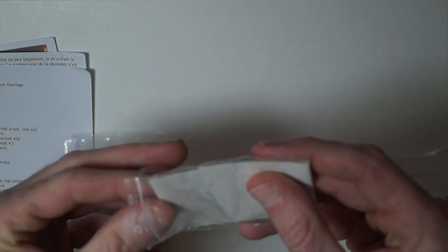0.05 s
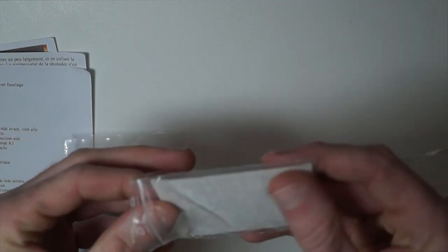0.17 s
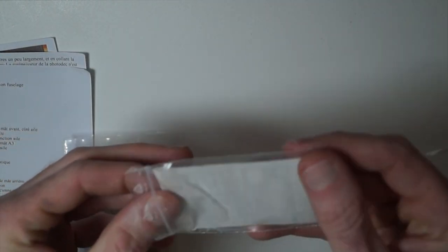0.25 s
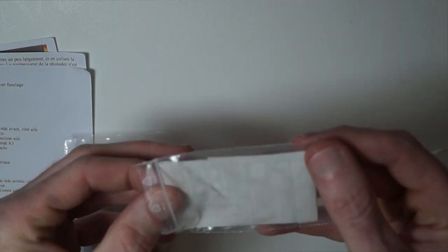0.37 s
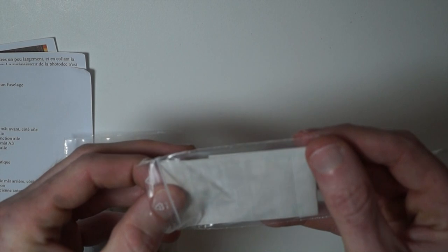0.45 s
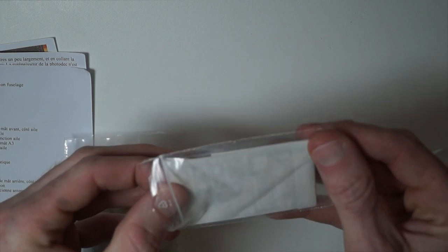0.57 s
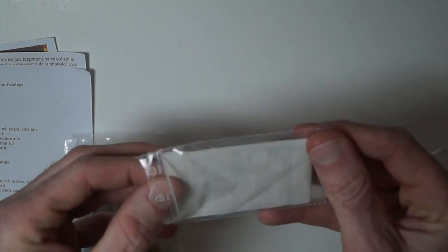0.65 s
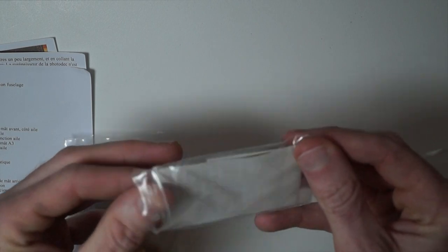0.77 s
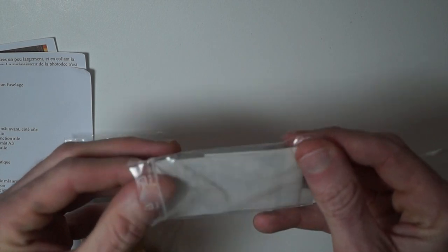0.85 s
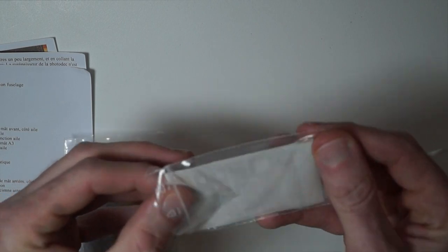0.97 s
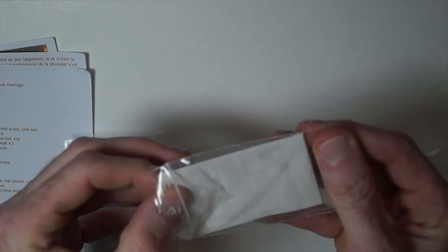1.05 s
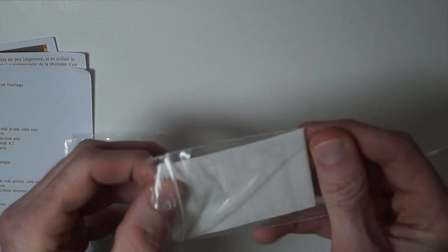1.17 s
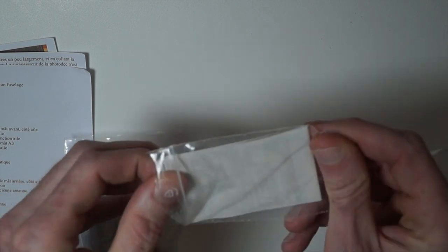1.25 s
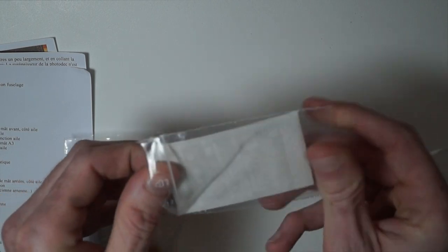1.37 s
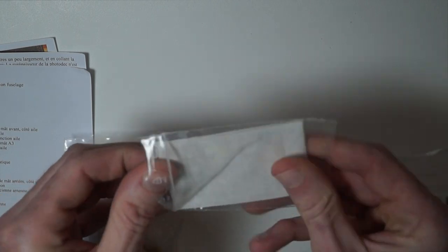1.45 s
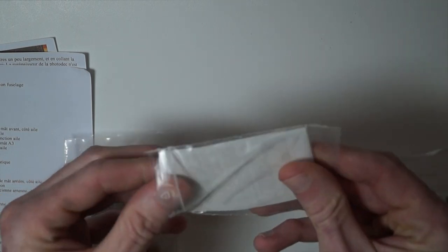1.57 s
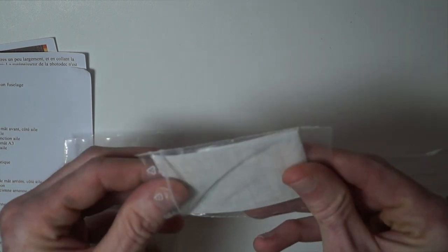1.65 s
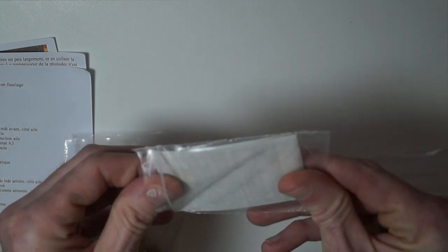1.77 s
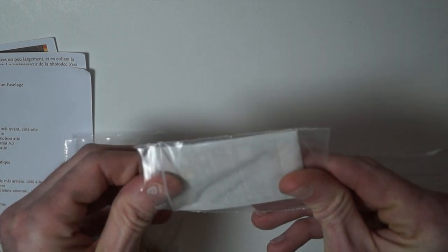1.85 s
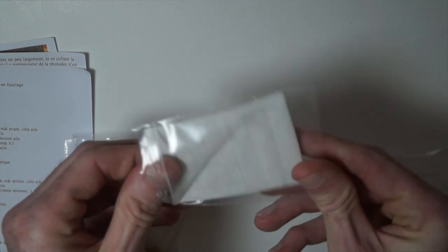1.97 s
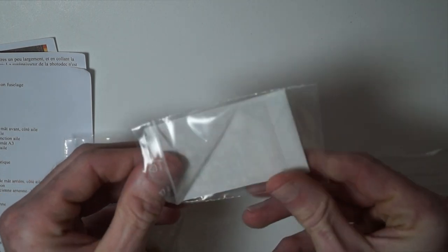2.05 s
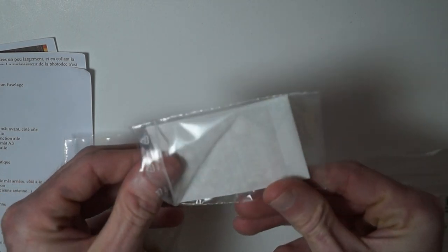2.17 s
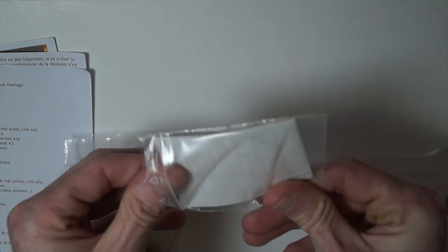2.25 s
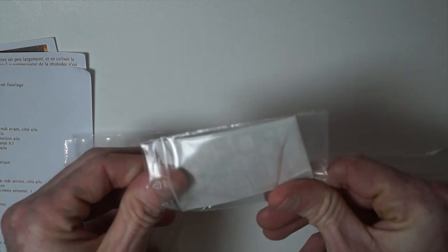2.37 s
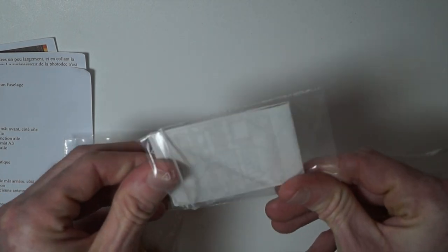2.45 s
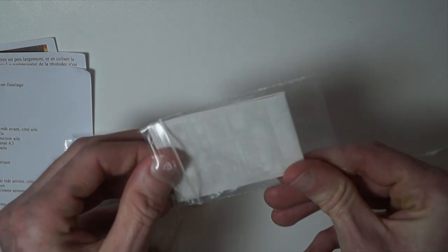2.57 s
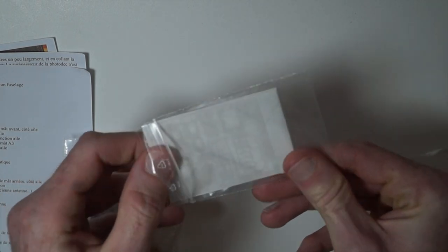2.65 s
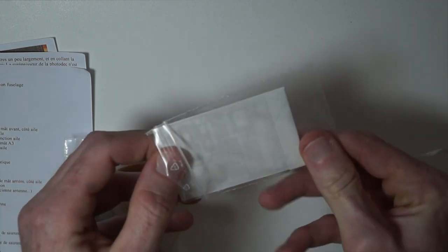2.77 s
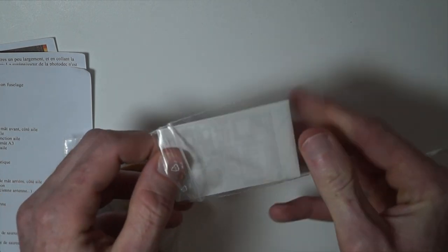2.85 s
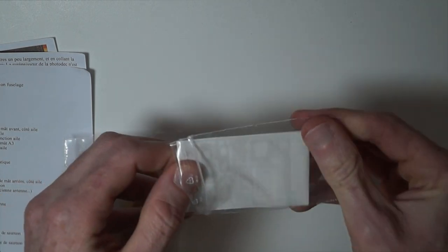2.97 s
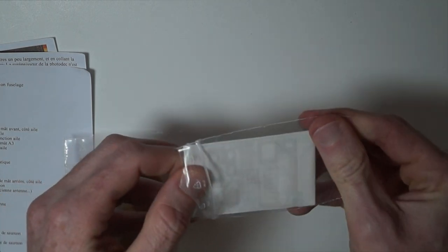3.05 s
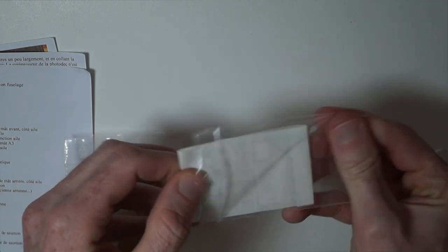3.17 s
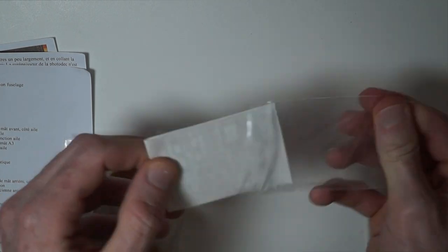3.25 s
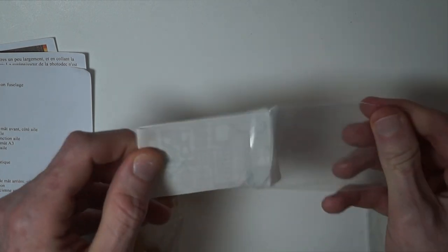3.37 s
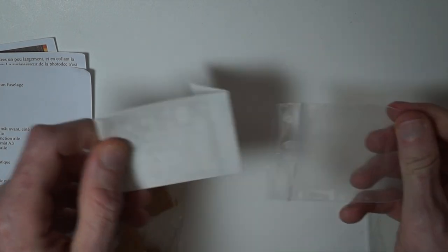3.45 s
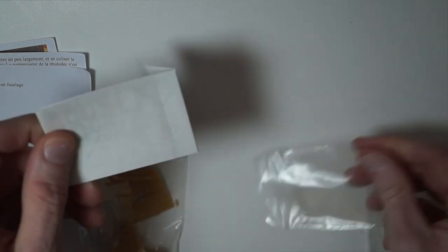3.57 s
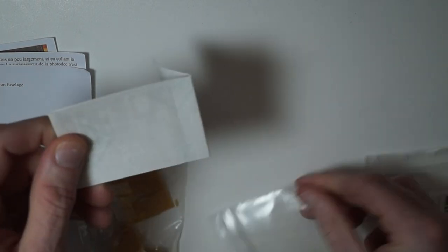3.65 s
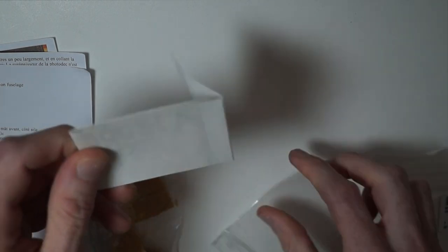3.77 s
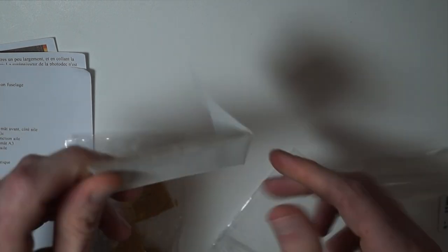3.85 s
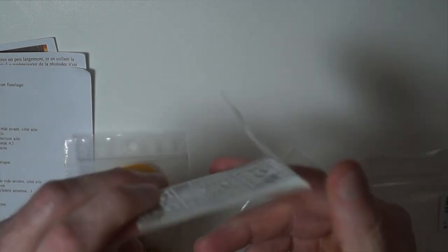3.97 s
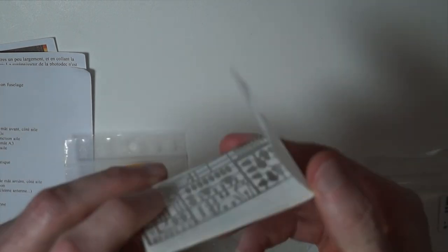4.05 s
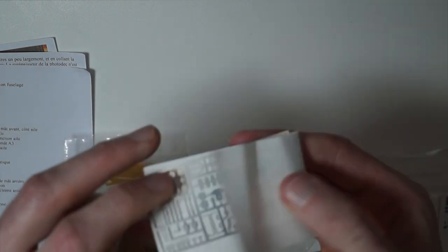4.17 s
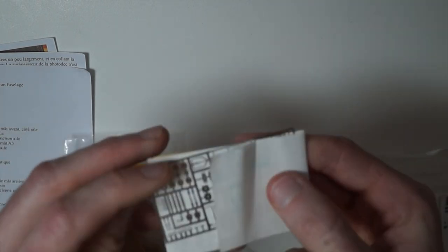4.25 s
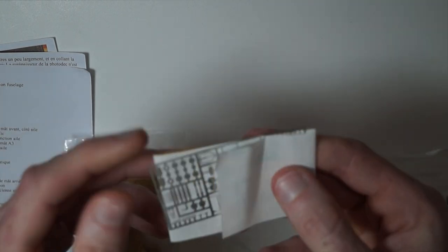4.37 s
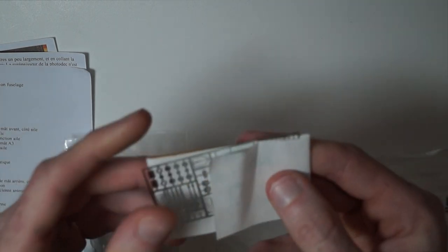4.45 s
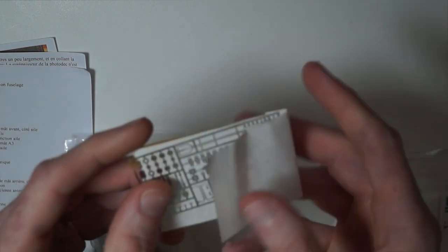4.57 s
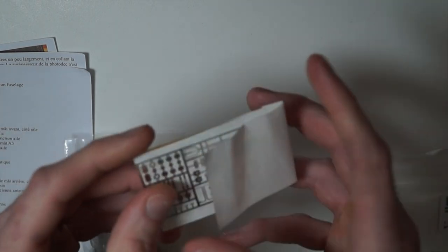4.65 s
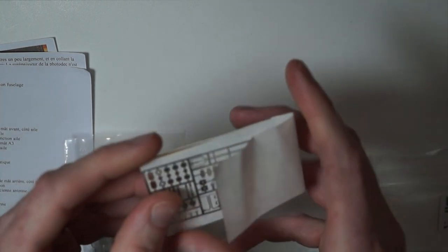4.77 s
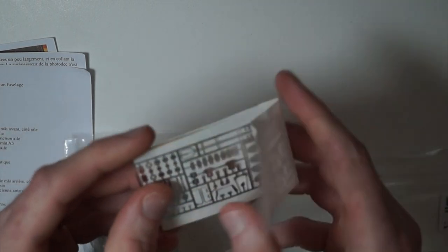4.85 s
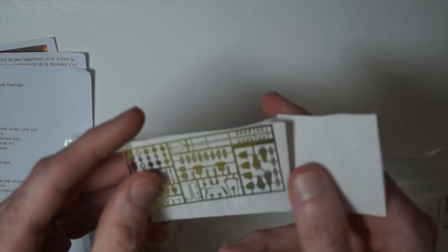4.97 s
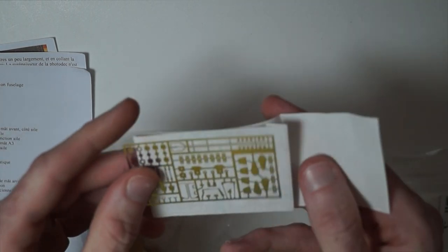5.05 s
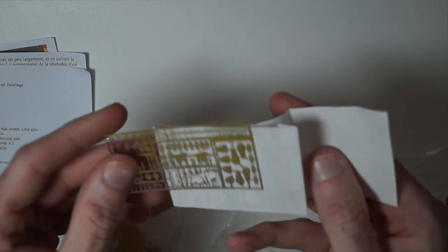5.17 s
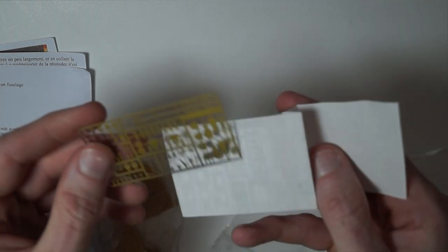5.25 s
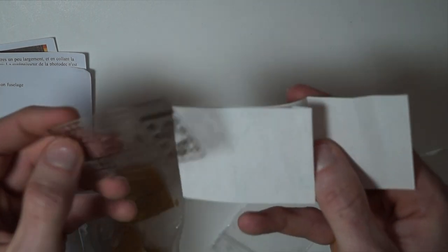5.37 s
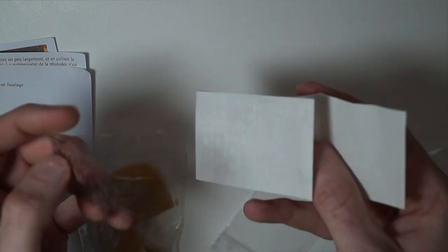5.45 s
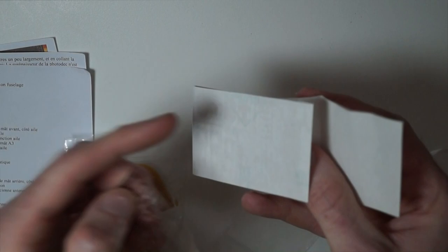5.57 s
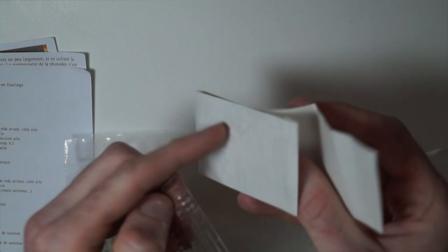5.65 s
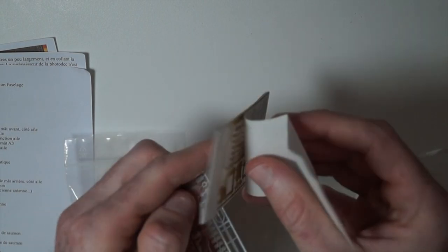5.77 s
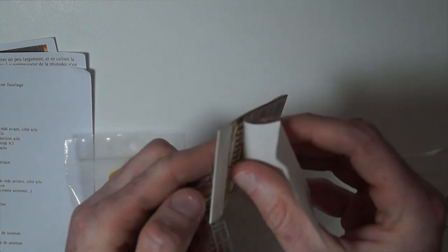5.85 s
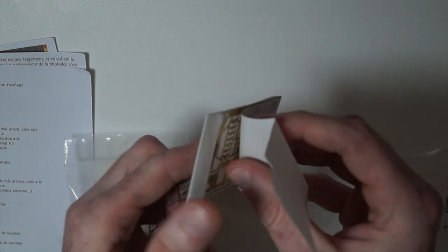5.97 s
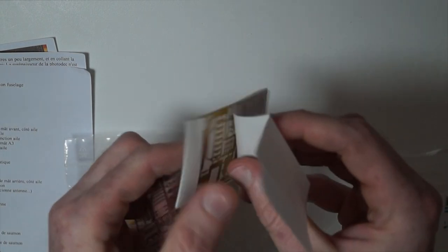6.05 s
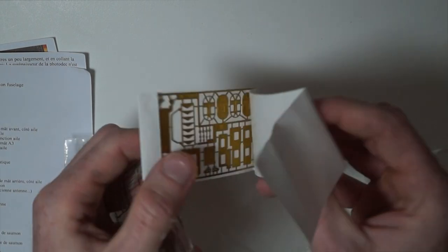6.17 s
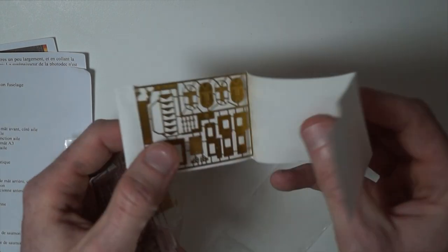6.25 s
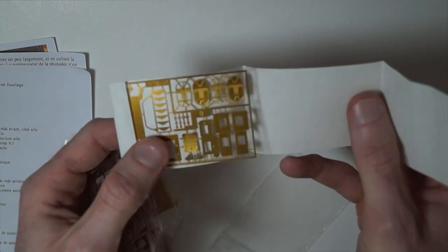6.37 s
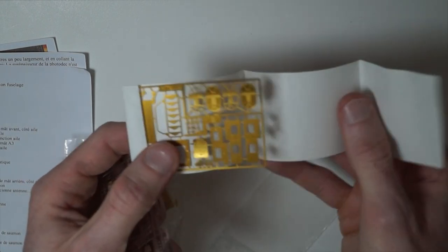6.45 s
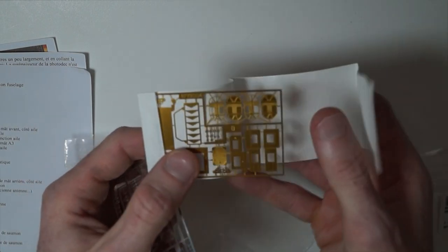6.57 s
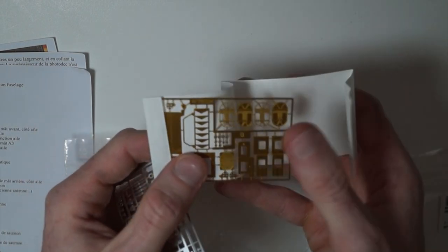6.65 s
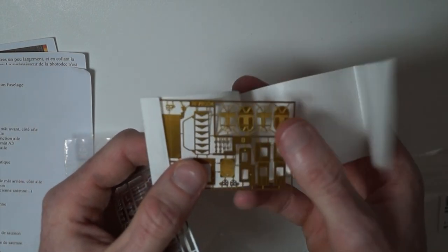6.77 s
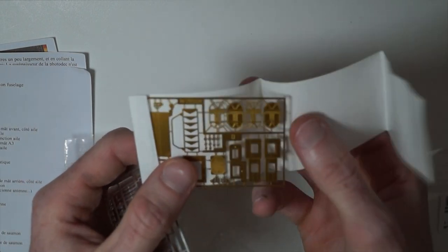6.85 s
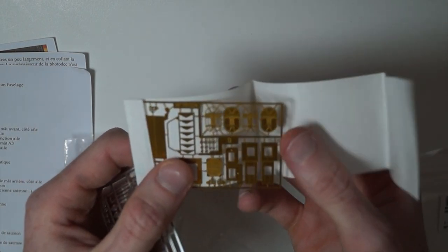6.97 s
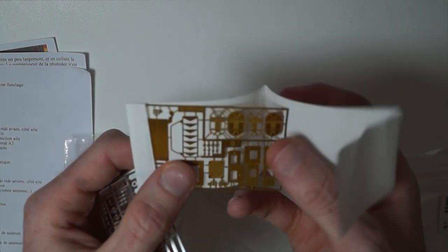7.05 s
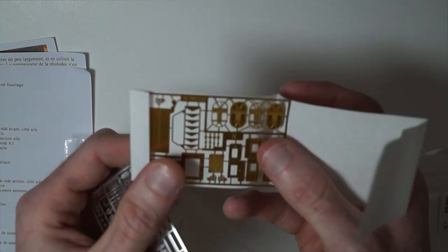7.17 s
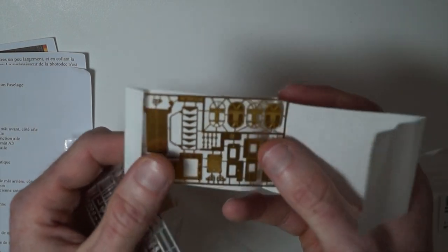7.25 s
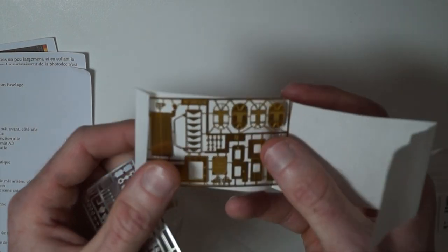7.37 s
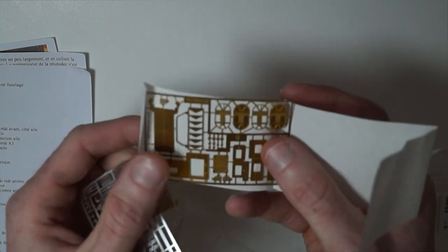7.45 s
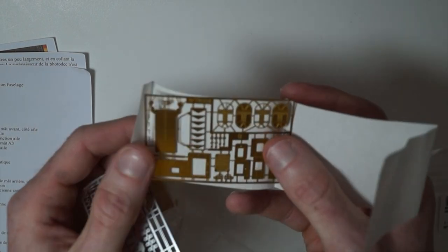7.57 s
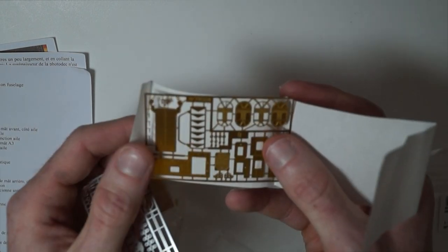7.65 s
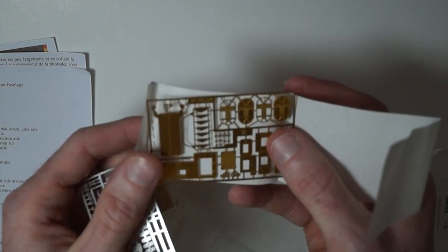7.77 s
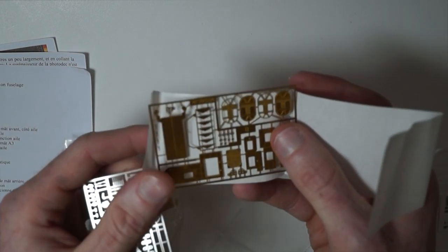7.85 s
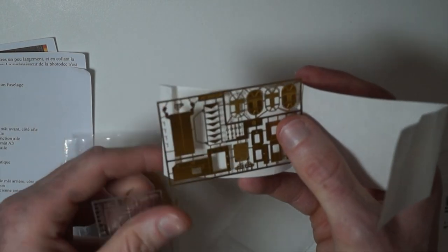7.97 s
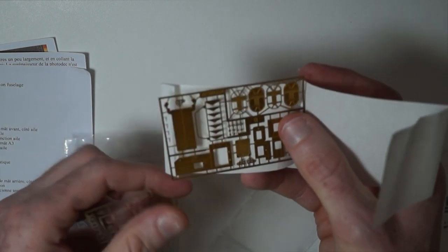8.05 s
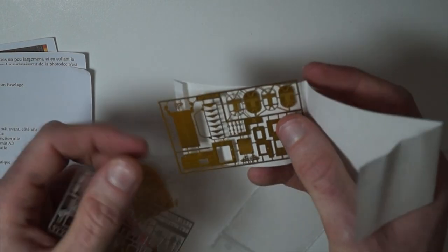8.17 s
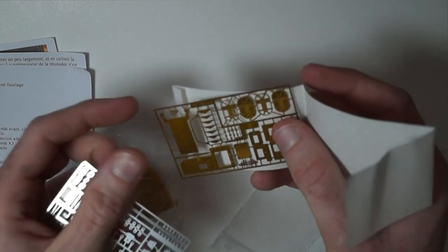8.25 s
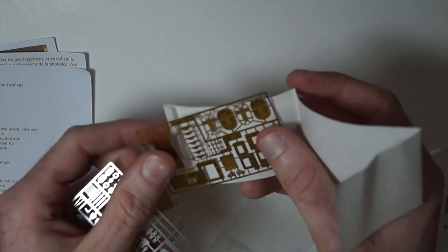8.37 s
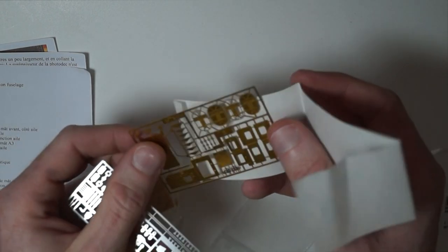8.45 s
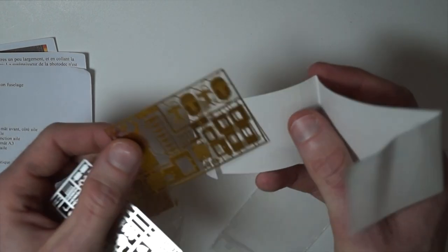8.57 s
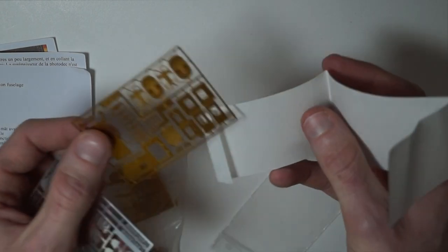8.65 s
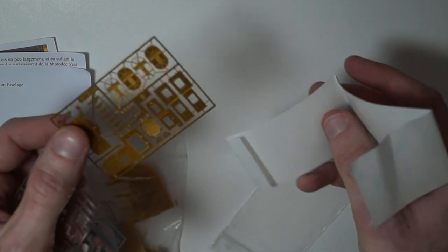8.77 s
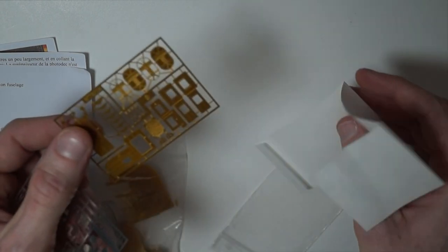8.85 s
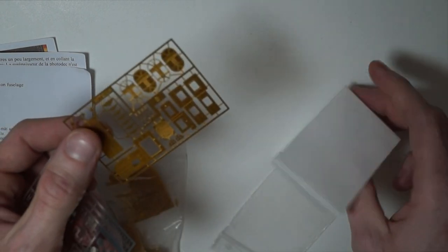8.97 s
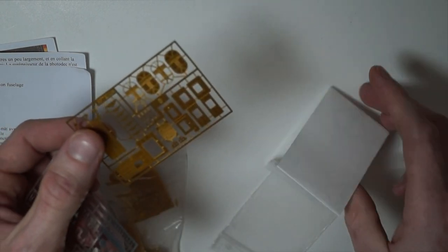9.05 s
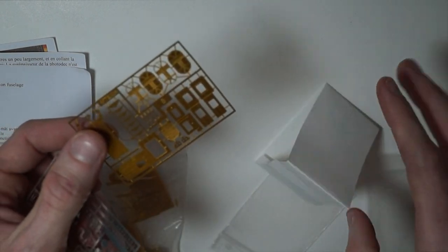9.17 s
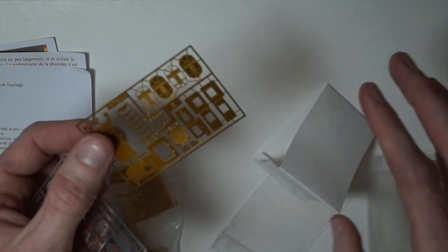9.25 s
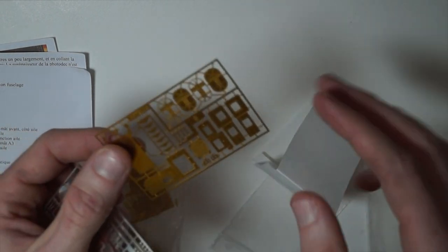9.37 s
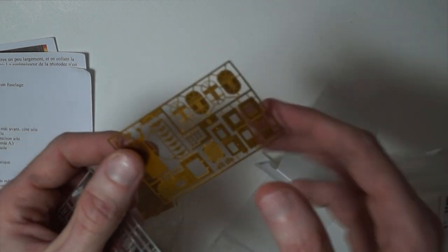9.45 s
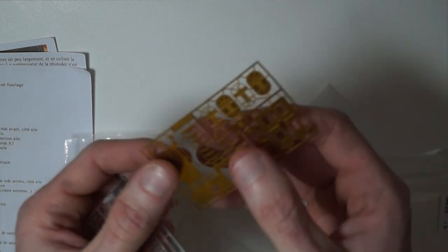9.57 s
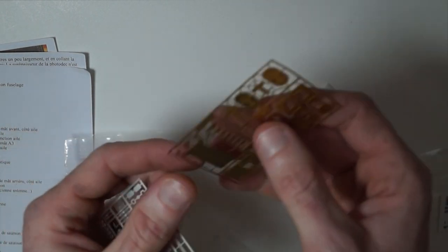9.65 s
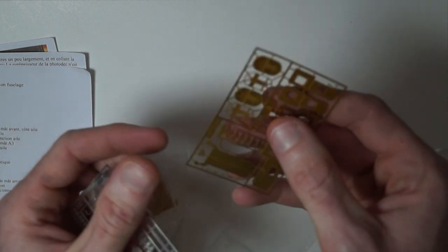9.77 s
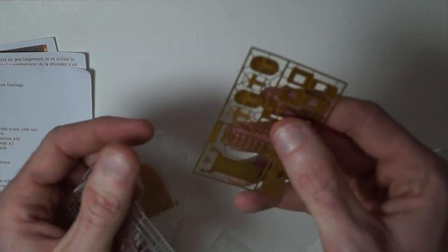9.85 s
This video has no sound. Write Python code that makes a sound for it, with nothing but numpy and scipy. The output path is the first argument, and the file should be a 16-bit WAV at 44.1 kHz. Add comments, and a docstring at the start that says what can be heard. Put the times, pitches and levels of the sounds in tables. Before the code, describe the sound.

Close up in a small quiet room, hands work a folded paper sleeve out of a thin plastic bag: irregular sharp crackles, a cluster of snaps, then the loudest rushing pull and snap. A soft desk bump follows. Stiff paper then unfolds with drier, lighter rustles and flicks, while thin metal sheets rub over it with a faint rasp and tiny clicks. Steady low hiss lies beneath.

```python
"""In a small quiet room, close up, hands slide a folded paper sleeve out of a plastic bag just above a desk.
The film snaps and hisses until the sleeve comes free, and a hand bumps the desk.
Then the stiff paper is unfolded and thin metal sheets slide over it.
Snaps are short noise bursts, sliding is noise broken up by tiny catches, and taps and bumps are
dying tones. The desk colours the handling, the room adds echoes, and a steady hiss lies beneath."""
import sys
import numpy as np
from scipy import signal
from scipy.fft import rfft, irfft
from scipy.io import wavfile

SR = 44100
rng = np.random.default_rng(int(sys.argv[2]) if len(sys.argv) > 2 else 0)


def dump(signal):
    """Clip the signal to [-1, 1] and save it as 16-bit WAV at the path in sys.argv[1]."""
    limited = np.clip(np.atleast_2d(signal).T, -1, 1)
    pcm = np.round(limited * 32767).astype(np.int16)
    wavfile.write(sys.argv[1], SR, pcm)


N = 436590

# tone colour of the plastic film, before it is evened out: [f/Hz, level/dB]
FILM_COLOUR = [(30, -53), (100, -28), (200, -19.5), (450, -7.5), (900, -2.5), (2000, 1.5), (4000, -2),
               (7000, -2), (11000, -3), (16000, -7.5)]
# tone colour of the stiff paper, before it is evened out: [f/Hz, level/dB]
PAPER_COLOUR = [(30, -50), (100, -26.5), (200, -21), (370, -7), (700, -3), (2000, -1.5), (4500, -6),
                (9000, -2), (15500, -2.5)]
# how alike left and right are for sounds at the hands: [f/Hz, likeness/0-1]
NEAR_LIKENESS = [(200, 0.78), (1200, 0.73), (2500, 0.81), (4500, 0.81), (8000, 0.15), (14000, 0.33)]
BAG_DOWN_S = 3.85  # the bag is let go; from here on only paper is handled
REST_S = 9.33  # the hands come to rest
BODY_HZ, SIZZLE_HZ = 1300, 6000  # borders between body, crackle and sizzle
CUT_HZ = 16080  # upper limit of the sound's bandwidth


def amp(db):
    """Turns decibels into a plain multiplier."""
    return 10 ** (np.asarray(db) / 20)


def unit(x):
    """Scales to an rms (average strength) of 1."""
    return x / np.sqrt(np.mean(x ** 2) + 1e-20)


def read(points, hz):
    """Reads a table between its points, on a logarithmic frequency axis."""
    f, value = np.transpose(points)
    return np.interp(np.log(hz + 1), np.log(f + 1), value)


def add(mix, s, sound):
    """Adds a sound to the mix at time s."""
    part = mix[..., max(round(s * SR), 0):][..., :sound.shape[-1]]
    part += sound[..., :part.shape[-1]]


def pair(likeness, size):
    """Makes spectra of two white noises, left and right, that are partly alike."""
    hz = np.fft.rfftfreq(size, 1 / SR)
    left, other = rfft(rng.standard_normal((2, size)))
    same = np.clip(read(likeness, hz), -1, 1)
    right = same * left + np.sqrt(1 - same ** 2) * other
    return hz, np.array([left, right])


def registers(colour, hz):
    """Splits a material's colour into body (low), crackle (middle) and sizzle (high), each of power 1."""
    above_body = 1 / (1 + (BODY_HZ / (hz + 1)) ** 6)
    above_crackle = 1 / (1 + (SIZZLE_HZ / (hz + 1)) ** 6)
    shares = [1 - above_body, above_body - above_crackle, above_crackle]
    return [unit(amp(read(colour, hz)) * np.sqrt(abs(share))) for share in shares]


def causal(gain):
    """Gives a frequency response the phase of a thing that rings only after it is struck."""
    log_gain = np.log(np.maximum(gain, 1e-5))
    circle = np.concatenate([log_gain, log_gain[-2:0:-1]])
    return np.exp(np.conj(signal.hilbert(circle)))[:len(gain)]


def effort():
    """Crackle, body and sizzle levels (dB) over time: each stroke rises, swells or eases, and dies away."""
    # strokes of the hands, one surface sliding over another; the last two levels are relative to the first:
    # [start/s, length/s, level/dB, swell from start to end/dB, body/dB, sizzle/dB]
    strokes = [ (0, 2.85, -68, -6, 2.5, -8), (0.028, 0.14, -57, -4, -0.5, -8),
               (0.228, 0.013, -42, -3.5, -5, 4), (0.337, 0.17, -64.5, -5, 4, -8),
               (0.525, 0.12, -62.5, -18, 3.5, -10), (0.683, 0.088, -51, -6, -7, 1),
               (0.79, 0.096, -57.5, 4, 5.5, -5), (0.91, 0.11, -48.5, -1, -5, -0.5),
               (1.158, 0.093, -53.5, 0, 1.5, 0.5), (1.3, 0.025, -58.5, -7, 2.5, 6),
               (1.435, 0.13, -55.5, 2, -2.5, 0), (1.6, 0.1, -59, -3, 0, -1),
               (1.935, 0.11, -61.5, -1, -7, 2.5), (2.21, 0.074, -57.5, -6, 1.5, -3),
               (2.349, 0.068, -42.5, 12.5, -10.5, -3.5), (2.49, 0.15, -54.5, -8, 0.5, -3),
               (2.8, 0.03, -63, 11, -1, 8), (2.95, 0.013, -55.5, -8, -2, 5), (3.09, .07, -56, -1, -14, 4),
               (3.174, 0.084, -31.5, 0, -17.5, -2.5), (3.343, .035, -48.5, 8.5, -3, -1),
               (3.403, 0.024, -27.5, -2, -13, 0), (3.455, 0.047, -52.5, -4, -1.5, -14),
               (3.598, 0.16, -59, -6, -4.5, 3.5), (3.98, 0.15, -49, -1, -4, 2),
               (4.11, 0.023, -42.5, -7, -1, -2), (4.15, 0.024, -49.5, 3, -6, 7),
               (4.19, 0.011, -43.5, -2, 0.5, 1.5), (4.251, 0.012, -41.5, -11, -2.5, 1),
               (4.49, 0.037, -59.5, -1, 6, 7), (4.57, 0.043, -67, 4, -12, 11),
               (4.774, .165, -53.5, 1.5, -3.5, 9), (5, .1, -57.5, 8, -3, 9.5),
               (5.11, 0.12, -59, -8, -19, 13.5), (5.222, 0.072, -47.5, -5, -30, 9.5),
               (5.315, 0.012, -52.5, 1, 3, 2), (5.403, 0.048, -52.5, -2.5, 2, 5),
               (5.587, 0.022, -48, -8, 2.5, -6), (5.665, 0.074, -51, -14, -2, 8.5),
               (5.757, 0.02, -47.5, -3, 1.5, 9), (5.827, 0.071, -53.5, -7.5, -13, 3),
               (5.93, 0.046, -62.5, 1, -1, 3), (6.052, .022, -50.5, 1.5, 6, 3.5),
               (6.16, .08, -53.5, 5, -0.5, -0.5), (6.249, 0.022, -43.5, 10.5, -3, 0.5),
               (6.295, 0.048, -52.5, -2, 0, 4.5), (6.38, 0.12, -60, -2, 0, -2), (6.57, 0.13, -56, 2, -4, 2),
               (6.784, 0.043, -47.5, 0.5, -1.5, 1.5), (6.939, 0.069, -50, -2, -6.5, -3),
               (7.054, 0.032, -48, -7, 0.5, 0), (7.11, 0.094, -48.5, 6, 0.5, 0),
               (7.24, 0.11, -57, 5.5, 4, 5), (7.415, 0.098, -54.5, 12, 1, -3),
               (7.5, 0.014, -47, -10, -14, 8), (7.76, .04, -56.5, -3, -6, -14),
               (7.866, 0.053, -45, 13, -3.5, -2), (8.09, 0.12, -65.5, -14, -19, -4),
               (8.352, .02, -54, -3, 8.5, -4), (8.377, 0.045, -44, 1.5, 4, 4.5),
               (8.45, 0.12, -55, 4, -5, 6), (8.64, 0.047, -63, -12, 1, -6),
               (8.912, 0.078, -58.5, -7, 4, -6), (9.043, 0.097, -51.5, 1.5, -5, -3.5),
               (9.243, 0.048, -55.5, 1, -4, 4)]
    # faint rubbing of the fingers between strokes: [crackle/dB, body/dB, sizzle/dB]
    holding_db = (-71, -83, -68.5)
    attack_db_per_s, release_db_per_s = 1495, 400  # catches quickly, dies away more slowly
    t = np.arange(0, N / SR, .001)
    power = np.outer(amp(holding_db) ** 2, t < REST_S) + 1e-12
    for start, length, db, swell_db, body_db, sizzle_db in strokes:
        progress = np.clip((t - start) / length, 0, 1)
        rise_db = attack_db_per_s * np.maximum(start - t, 0)
        fall_db = release_db_per_s * np.maximum(t - start - length, 0)
        level = amp(db + swell_db * (progress - .5) - np.minimum(rise_db + fall_db, 100))
        power += np.outer(amp([0, body_db, sizzle_db]), level) ** 2
    return [np.interp(np.arange(N) / SR, t, 10 * np.log10(p)) for p in power]


def small_snaps(effort_db, span, over_db, top_db, count):
    """Lesser creases give way at random, at a level that follows the sliding that provokes them."""
    rows = []
    for s in rng.uniform(*span, count):
        strength, colour, stretch = rng.standard_normal(3)
        db = min(effort_db[int(s * SR)] + over_db, top_db) + 2 * strength
        sizzle_db = -6 + 4 * colour
        length = 0.0021 * np.exp(.5 * stretch)
        rows.append((s, db, sizzle_db, length))
    return rows


def facets(hz, depth_db=2.2, count=40):
    """Each patch of sheet has its own random resonances: a wavy curve of gain over frequency."""
    knots = np.linspace(np.log(300), np.log(CUT_HZ), count)
    return amp(depth_db * np.interp(np.log(hz + 1), knots, rng.standard_normal(count)))


def snaps(effort_db, size=2048):
    """A crease gives way in a short burst of noise, and the sheet flutters briefly after it."""
    # the clearest creases buckling and edges flicking, sizzle relative to the level:
    # [t/s, level before trim/dB, sizzle/dB, length/s]
    clear_snaps = [(0.0298, -35, -6, 0.0026), (0.0619, -26.5, -0.5, 0.0014), (0.099, -41, -7, 0.00035),
                   (0.167, -50, -14, 0.00046), (0.2125, -42, -14, 0.0027), (0.2243, -20.5, 1, 0.0059),
                   (0.3355, -43, 4.5, 0.0039), (0.3386, -36.5, -0.5, 0.00024),
                   (0.4344, -36.5, -0.5, 0.0003), (0.5238, -39, .5, .0005), (0.6657, -45, -2, .003),
                   (0.672, -52, 1, 0.003), (0.6782, -31.5, 7.5, 0.0017), (0.706, -46, -11, .0006),
                   (0.7228, -38, -3.5, 0.0031), (0.7582, -40, -5, 0.005), (0.866, -46, 5, 0.0076),
                   (0.9132, -36, 3.5, 0.00056), (0.9366, -40, 1, 0.00072), (0.9586, -32, -2, 0.00059),
                   (0.9826, -40, 3.5, 0.00079), (1.0231, -40, -7, .001), (1.1158, -48.5, -4, 0.0028),
                   (1.1715, -37, -10, 0.0029), (1.3013, -42, -3, 0.012), (1.4321, -44.5, 2.5, 0.0077),
                   (1.5222, -36, -4.5, 0.012), (1.6656, -40.5, -1, 0.001), (1.7935, -54, 3.5, 0.0026),
                   (1.9768, -52, 0, .003), (2.129, -42.5, -5, 0.0011), (2.2151, -38.5, -1.5, 0.0038),
                   (2.3195, -45, -3, 0.0024), (2.3298, -40, -3, 0.0034), (2.341, -29, 0.5, 0.00098),
                   (2.3818, -33, -11, 0.0023), (2.3994, -27, 1, 0.0031), (2.4101, -25, -2, .0055),
                   (2.5076, -34.5, -3.5, 0.0019), (2.5969, -45, -6, 0.00058), (2.657, -38.5, -8, 0.0038),
                   (2.7373, -52.5, 1, 0.00038), (2.9504, -38.5, -6, 0.0013), (3.0899, -39, 9.5, 0.0011),
                   (3.1407, -38, -4, .0012), (3.1637, -17.5, 1.5, 0.0013), (3.1895, -25, 3.5, 0.0086),
                   (3.383, -22.5, -2, 0.015), (3.4044, -19.5, 2.5, 0.0067), (3.4157, -29, 3, 0.0017),
                   (4.2493, -28.5, 5.5, 0.0024), (4.9185, -37.5, 6.5, 0.0053), (4.9585, -44, -1, .0014),
                   (5.2093, -37.5, -14, 0.0057), (5.5829, -25.5, -16, 0.0017), (5.6643, -36, 6, 0.0013),
                   (5.7517, -43.5, 7.5, .0096), (6.066, -40.5, 2, 0.011), (6.5832, -43, 0, 0.0019),
                   (6.6021, -41, -14, 0.0029), (6.9293, -41.5, -15, 0.00054), (7.0339, -41, -10, .005),
                   (7.4125, -40, -7, 0.0045), (7.4484, -41, -15, 0.0011), (7.4952, -35.5, 8.5, 0.0011),
                   (7.8727, -41, -14, 0.0015), (7.8937, -42, 7, 0.0018), (7.9138, -22, -1, 0.0046),
                   (8.4298, -35, 3.5, 0.0044), (8.6354, -43.5, 2.5, 0.011), (8.9933, -36, 7.5, 0.014)]
    film_creases = small_snaps(effort_db, (0, BAG_DOWN_S), over_db=3, top_db=-51, count=40)
    paper_creases = small_snaps(effort_db, (BAG_DOWN_S, REST_S), over_db=-0.5, top_db=-52.5, count=25)
    trim_db, flutter_share, flutter_s = -0.5, .4, .005
    out, t = np.zeros((2, N)), np.arange(size) / SR
    for s, db, sizzle_db, length in clear_snaps + film_creases + paper_creases:
        # harder snaps are thinner: they have less body
        body_db = -5.5 - 0.4 * max(db + 40, -10)
        # film buckles at once; a paper edge scrapes a moment before it flicks free
        colour, rise_s = (FILM_COLOUR, .0003) if s < BAG_DOWN_S else (PAPER_COLOUR, 0.000857)
        after = np.maximum(t - 2 * rise_s, 0)
        rise = 1 - np.exp(-(t / rise_s) ** 2)
        fall = np.exp(-(after / length) ** 2) + flutter_share * np.exp(-after / flutter_s)
        hz, noise = pair(NEAR_LIKENESS, size)
        body, crackle, sizzle = registers(colour, hz)
        gain = np.sqrt((amp(body_db) * body) ** 2 + crackle ** 2 + (amp(sizzle_db) * sizzle) ** 2)
        burst = irfft(rfft(irfft(noise) * rise * fall) * causal(gain * facets(hz)))
        # the level is the rms of the whole snap packed into 5 ms
        strength = amp(db + trim_db) * np.sqrt(np.mean(gain ** 2) * .005 * SR / size)
        add(out, s - rise_s, strength * unit(burst))
    return out


def catches(per_s, spread_db, decay_s=.001):
    """Surfaces stick and slip in many tiny catches of very unequal size; this is their envelope."""
    sizes = amp(spread_db * np.minimum(rng.exponential(1, N), 4)) * (rng.random(N) < per_s / SR)
    power = signal.lfilter([1], [1, -np.exp(-1 / (decay_s * SR))], sizes ** 2)
    return unit(np.sqrt(power))


def flex(x, depth_db=2.5, size=512):
    """The sheet's resonances shift as it bends: patches of colour come and go."""
    z = signal.stft(x, nperseg=size)[2]
    blur = np.outer(np.hanning(7), np.hanning(7))
    patches = unit(signal.oaconvolve(rng.standard_normal(z.shape[1:]), blur, "same"))
    return unit(signal.istft(z * amp(depth_db * patches), nperseg=size)[1][:, :N])


def sliding(levels, colour, grain, smooth_share, low_db):
    """Friction: a smooth hiss and tiny catches excite the sheet as hard as the hands move it."""
    db, body_db, sizzle_db = levels
    hz, noise = pair(NEAR_LIKENESS, N)
    # in a hard pull the catches crowd together into a rush
    smooth = np.clip(smooth_share + np.interp(db, [-45, -33], [0, .4]), 0, .95)
    drive = rfft(flex(irfft(noise, N)) * np.sqrt(smooth + (1 - smooth) * grain ** 2))
    body, crackle, sizzle = (irfft(drive * gain, N) for gain in registers(colour, hz))
    return amp(body_db + low_db) * body + amp(db) * crackle + amp(sizzle_db) * sizzle


def rustle(levels):
    """Crinkly film slides first, then finer-grained paper, which rasps while a metal sheet rubs it."""
    # resonances of the metal sheet while fingers damp it: [f/Hz, width/Hz, level/dB]
    rasp_modes = [(2460, 530, -5), (4100, 330, -13)]
    # the metal sheet rubs along the paper: [start/s, end/s]
    rub_span = (6.55, 9.2)
    t = np.arange(N) / SR
    crinkle = catches(per_s=380, spread_db=4.8)
    fibres = catches(per_s=800, spread_db=3.9)
    film = sliding(levels, FILM_COLOUR, crinkle, smooth_share=0.46, low_db=1.5)
    paper = sliding(levels, PAPER_COLOUR, fibres, smooth_share=0.54, low_db=-4.5)
    rasp = np.zeros((2, N))
    for hz, width, db in rasp_modes:
        rasp += amp(db) * signal.lfilter(*signal.iirpeak(hz, hz / width, SR), paper)
    rubbing = (t > rub_span[0]) & (t < rub_span[1])
    return np.where(t < BAG_DOWN_S, film, paper + rubbing * rasp)


def ticks(effort_db, per_s=110, spread_db=2.0, cycles=1.4, count=30):
    """Tiny facets flip as the sheets move, each with a brief pitch; per_s counts all pitches together."""
    force = amp(np.minimum(effort_db, -45) + 4)
    out, t = np.zeros((2, N)), np.arange(1024) / SR
    for hz in np.geomspace(1400, 7500, count):
        sizes = amp(spread_db * np.minimum(rng.exponential(1, N), 3))
        flips = sizes * (rng.random(N) < per_s / count / SR)
        age = t * hz / cycles
        tick = np.sin(2 * np.pi * hz * t) * np.e * age * np.exp(-age)
        sides = amp(2 * rng.standard_normal(2))  # left and right strength
        out += np.outer(sides, signal.oaconvolve(flips * force, tick)[:N])
    return out


def hiss_swells(size=4096):
    """Brief swells of hiss within the sliding: paper-coloured noise that rises and falls smoothly."""
    # [t at the middle/s, level/dB, length/s]
    swells = [(3.729, -41, 0.007), (3.978, -35.5, 0.01), (4.122, -35.5, 0.017), (4.334, -48, 0.013),
              (4.491, -45.5, 0.0079), (4.794, -55, 0.012), (5.1, -48, 0.0042), (6.796, -46, .0075),
              (6.876, -43.5, 0.024), (7.158, -39.5, 0.0036), (8.379, -43, 0.018), (9.242, -41.5, 0.008)]
    out, t = np.zeros((2, N)), (np.arange(size) - size // 2) / SR
    for s, db, length in swells:
        hz, noise = pair(NEAR_LIKENESS, size)
        hiss = unit(irfft(noise * amp(read(PAPER_COLOUR, hz))))
        add(out, s + t[0], amp(db) * hiss * np.exp(-(t / length) ** 2))
    return out


def knocks(blows, modes, trim_db, contact_s):
    """Each blow rings the same dying tones; small things radiate almost no deep bass."""
    out, t = np.zeros((2, N)), np.arange(SR // 3) / SR
    ring = np.zeros(len(t))
    for hz, db, t60 in modes:
        ring += amp(db) * np.exp(-np.log(1000) * t / t60) * np.cos(2 * np.pi * hz * t)
    no_bass = signal.butter(2, 230, "high", fs=SR, output="sos")
    ring = signal.sosfilt(no_bass, ring * (1 - np.exp(-t / contact_s)))
    for s, db in blows:
        add(out, s, amp(db + trim_db) * ring)
    return out


def taps(t60=0.021, overtone=1.86, overtone_db=-12):
    """Held stiff paper, gripped or flexing, sounds one short hollow note set by the grip."""
    # [t/s, level before trim/dB, f/Hz]
    grips = [(0.226, -19.5, 1500), (1.024, -32.5, 1470), (1.172, -35.5, 910), (2.4, -26, 950),
             (3.384, -18, 1595), (4.12, -44, 860), (4.25, -29, 920), (4.944, -37.5, 937),
             (5.209, -36.5, 940), (5.41, -34, 700), (6.321, -34.5, 1460), (6.409, -34, 866),
             (6.431, -37.5, 750), (6.981, -41.5, 670), (7.916, -31, 715), (8.98, -39, 665),
             (9.24, -43, 1350), (9.502, -47, 1440)]
    out = np.zeros((2, N))
    for s, db, hz in grips:
        modes = [(hz, 0, t60), (hz * overtone, overtone_db, t60 / 2)]
        out += knocks([(s, db)], modes, trim_db=-0.5, contact_s=0.00029)
    return out


def metal_pings():
    """A thin metal sheet clicks as it flexes, ringing its own set of short tones."""
    # tones of the sheet, with the time to die by 60 dB: [f/Hz, level/dB, t60/s]
    sheet_modes = [(800, -12, .06), (1230, -11, 0.036), (1884, -2, .04), (2230, 4, 0.042),
                   (2770, -7.5, .05), (3260, -4, 0.03), (4000, 8, 0.016), (4100, 7, 0.016),
                   (4900, 5, 0.013), (6207, -5, .015), (9100, -1, 0.0065)]
    # clicks: [t/s, level before trim/dB]
    clicks = [(5.2087, -43), (8.9084, -35)]
    return knocks(clicks, sheet_modes, trim_db=-2.5, contact_s=0.00026)


def desk_bumps():
    """A hand bumps the desk top, which rings briefly with its own set of tones."""
    # tones of the desk top, with the time to die by 60 dB: [f/Hz, level/dB, t60/s]
    desk_modes = [(251, -17, 0.042), (335, -3, 0.037), (405, -2.5, 0.05), (553, 2.5, 0.028),
                  (654, 2.5, 0.044), (840, -3.5, 0.02), (1050, -1, 0.017), (1470, -8, 0.014),
                  (2300, 4, 0.011)]
    # bumps: [t/s, level before trim/dB]
    hits = [(3.6693, -33.5), (3.684, -49), (3.717, -51)]
    return knocks(hits, desk_modes, trim_db=3, contact_s=0.00018)


def drag(centre_hz=490, width_hz=100, trim_db=-5.0):
    """Skin dragging on the bag makes a soft hollow murmur: noise through one broad low resonance."""
    # [t/s, level before trim/dB]
    murmur = [(0, -64), (.5, -64), (.9, -59), (1.3, -92), (1.5, -57.5), (1.9, -63.5), (2.3, -75),
              (2.65, -81), (2.77, -60), (2.95, -80), (3.2, -69)]
    hz, noise = pair(NEAR_LIKENESS, N)
    hollow = unit(irfft(noise / (1 + ((hz - centre_hz) / width_hz) ** 2), N))
    s, db = np.transpose(murmur)
    return hollow * np.interp(np.arange(N) / SR, s, amp(db + trim_db), right=0)


def desk_echo(x, size=2048):
    """The desk top mirrors the hands, which lifts some bands and hollows others; the sides differ slightly."""
    # [f/Hz, level/dB]
    mirror_colour = [(380, -4.5), (500, -2.5), (600, -6), (700, -2.5), (950, -2.5), (1220, -9), (1530, -3),
                     (1760, -8.5), (1900, -4), (2100, -5), (2400, -1), (3000, -4), (4100, 1), (5300, -1)]
    # left over right: [f/Hz, level/dB]
    balance = [(250, 2.5), (1000, -1), (4000, -0.5), (8000, -0.2), (14000, -2)]
    hz = np.fft.rfftfreq(size, 1 / SR)
    sides = []
    for side in (.5, -.5):
        colour_db = read(mirror_colour, hz) + side * read(balance, hz)
        sides.append(irfft(causal(amp(colour_db))))
    return signal.oaconvolve(x, np.array(sides), axes=1)[:, :N]


def room(x, wet_db=-10.0, early_db=5, early_s=0.0062, size=16384):
    """Close walls answer within milliseconds; a short blurred tail of dying noise follows."""
    # how alike left and right are in the tail: [f/Hz, likeness/0-1]
    tail_likeness = [(200, 0.16), (1200, 0.083), (2500, 0.24), (8000, 0.092)]
    # time for the tail to die by 60 dB: [f/Hz, t60/s]
    tail_t60 = [(200, 0.17), (1000, 0.23), (4000, 0.19), (14000, 0.13)]
    noise = irfft(pair(tail_likeness, size)[1])
    hz, t, z = signal.stft(noise, SR, nperseg=256)
    decay = np.exp(-np.log(1000) * t / read(tail_t60, hz)[:, None])
    tail = signal.istft(z * decay, SR, nperseg=256)[1]
    t = np.arange(tail.shape[1]) / SR
    tail = tail * (t > .004) * (1 + amp(early_db) * np.exp(-t / early_s))
    return amp(wet_db) * signal.fftconvolve(x, tail / np.linalg.norm(tail[0]), axes=1)[:, :N]


def floor(level_db=-58.3):
    """Steady hiss of room and microphone: coloured noise."""
    # colour before the overall level is set: [f/Hz, level/dB]
    hiss_colour = [(15, -56), (25, -15.5), (114, -16), (145, -13), (166, -11), (277, -5.5), (470, -2),
                   (936, -4.5), (1600, -5.5), (16000, -15.5)]
    # how alike left and right are: [f/Hz, likeness/0-1]
    hiss_likeness = [(40, 0), (200, 0), (600, 0), (2000, 0), (8000, 0)]
    hz, noise = pair(hiss_likeness, N)
    return amp(level_db) * unit(irfft(noise * amp(read(hiss_colour, hz)), N))


def scene():
    """Film, paper, metal and desk, heard close up in the room."""
    levels = effort()
    effort_db = levels[0]
    sheets = desk_echo(snaps(effort_db) + rustle(levels) + ticks(effort_db) + hiss_swells())
    blows = taps() + metal_pings() + desk_bumps()
    near = sheets + blows + drag()
    return near + room(near) + floor()


def record(dry):
    """Removes everything above the bandwidth limit with a steep filter."""
    low_pass = signal.firwin(511, CUT_HZ, window=("kaiser", 9), fs=SR)
    return signal.oaconvolve(dry, low_pass[None], "same")


dry = scene()
out = record(dry)
dump(out)
```